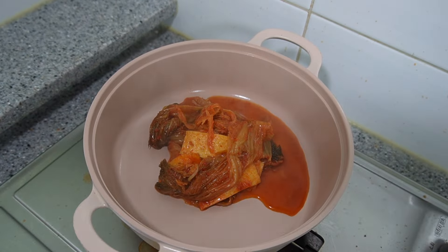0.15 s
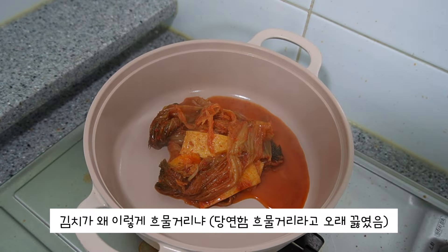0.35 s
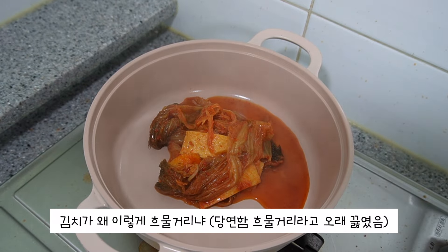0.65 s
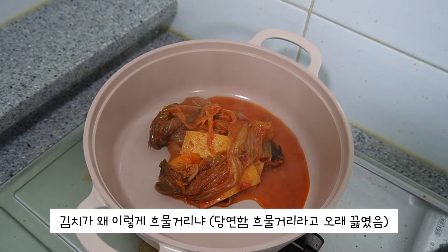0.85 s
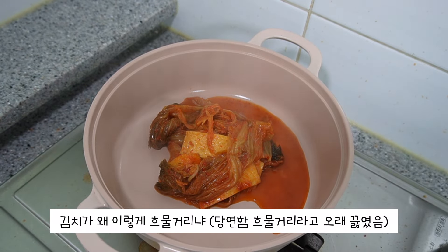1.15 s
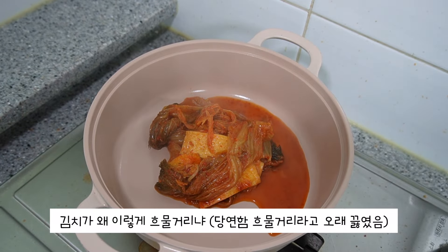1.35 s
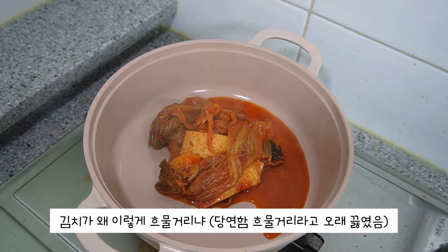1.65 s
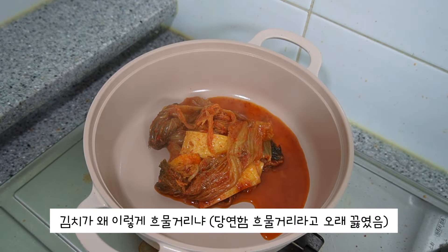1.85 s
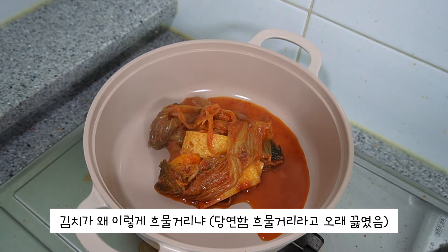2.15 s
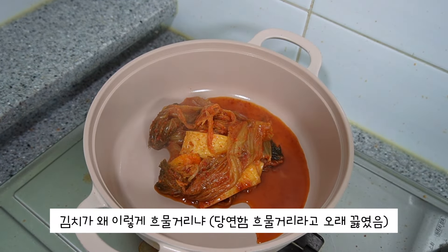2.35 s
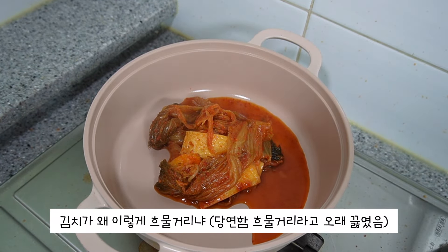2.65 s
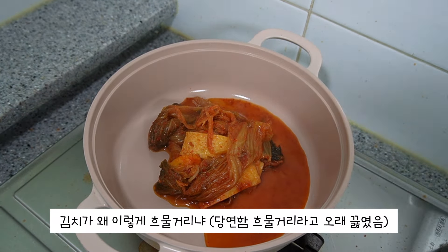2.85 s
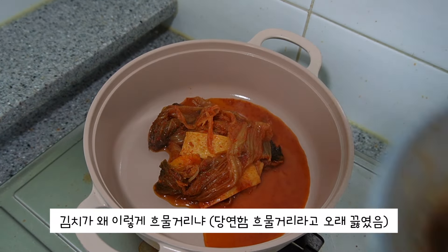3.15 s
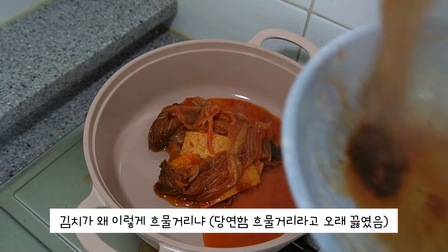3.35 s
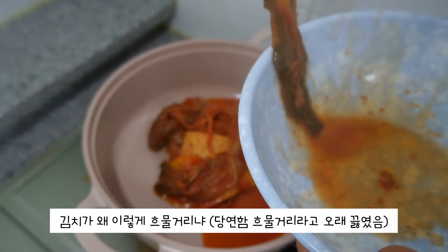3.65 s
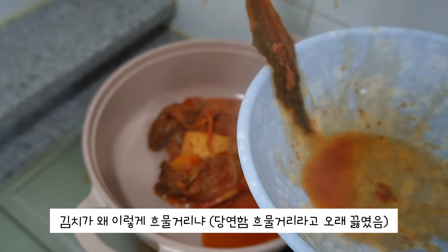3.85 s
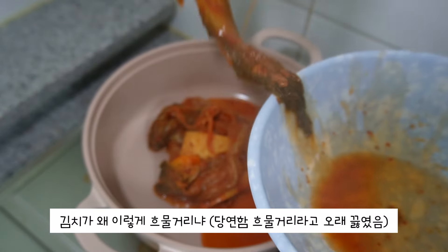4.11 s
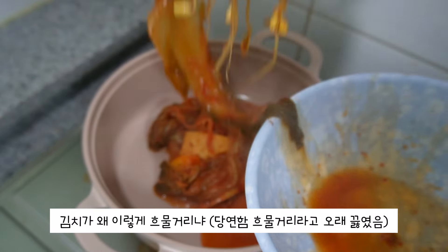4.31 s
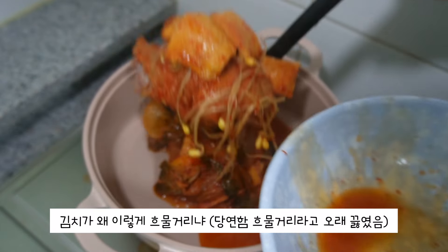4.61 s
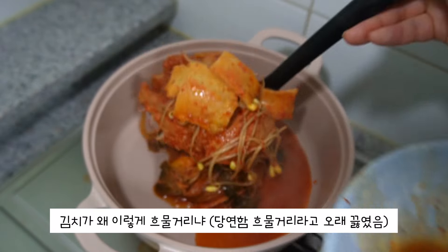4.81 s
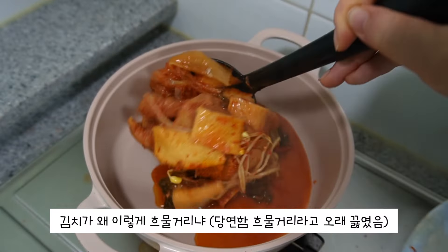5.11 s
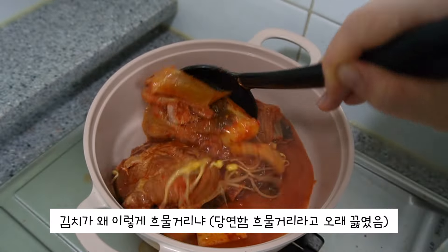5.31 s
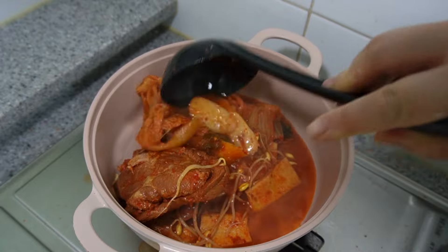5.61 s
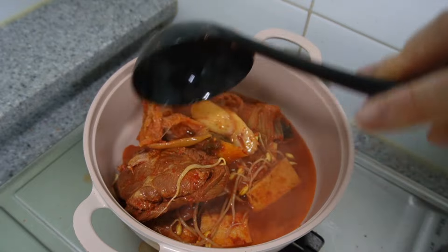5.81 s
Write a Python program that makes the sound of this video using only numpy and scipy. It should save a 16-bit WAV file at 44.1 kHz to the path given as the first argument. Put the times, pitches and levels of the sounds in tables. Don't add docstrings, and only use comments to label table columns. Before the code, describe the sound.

Rapid sharp sparking lights a gas burner in a small kitchen; a soft hiss follows, with drips, then sloppy wet food landing and being pressed.

```python
import sys
import numpy as np
from scipy import signal
from scipy.fft import rfft
from scipy.io import wavfile
from scipy.ndimage import uniform_filter1d

SR = 44100
rng = np.random.default_rng(int(sys.argv[2]) if len(sys.argv) > 2 else 0)


def inscribe(sig):
    pcm = np.round(np.clip(np.atleast_2d(sig).T, -1, 1) * 32767)
    wavfile.write(sys.argv[1], SR, pcm.astype(np.int16))


def magnitude_from_level(level_db):
    exponent = np.asarray(level_db, float) / 20
    return 10 ** exponent


N = 263277

# [f/Hz, level/dB]
ROAR_COLOUR = [(12, -45), (20, -44.5), (75, -3), (125, 0), (245, -5.5), (399, -16), (692, -9), (866, -18),
               (1110, -9.5), (1530, -13), (1730, -17), (1920, -10), (2120, -32), (2300, -21.5), (2600, -30),
               (3380, -65), (5720, -120)]
# [f/Hz, level/dB]
JET_COLOUR = [(1350, -39), (2300, -6), (2880, -6.5), (3410, -0.5), (3840, -6), (4260, -2.5), (4960, -4),
              (5780, 2), (7120, -3.5), (7710, 0.5), (8420, -5.5), (11000, -8), (15600, -12.5)]
# [f/Hz, width/Hz, level/dB]
JET_BANDS = [(4200, 260, 2), (4630, 52, -1), (5570, 86, -4), (7450, 53, -9), (9300, 150, -7),
             (10960, 600, -7), (12500, 140, -19), (13800, 200, -10)]
ROAR_DB, JETS_DB = -49.5, -55
SETTLE_DB, SETTLE_S = 10.5, 0.18
UNLIT_DB, LIT_S, SPREAD_S = -10.5, 0.35, 0.2
SEEP_DB, OPEN_S, OPENING_S = -13.5, 2.57, 0.65
WARMING_DB_PER_S = 0.5

# [t/s, peak level/dB, ring f/Hz,
# t60/s, noise share/0-1]
KNOB_CLICKS = [(.001, -41, 700, 0.031, 0.3), (.001, -43.5, 2790, 0.12, 0.7), (.002, -48, 5700, 0.046, 0.3),
               (.0155, -29, 483, 0.16, 0.74), (0.017, -33.5, 1205, 0.061, 0.4),
               (0.023, -29.5, 2260, 0.045, 0.55), (.030, -42, 5300, .03, 0.4),
               (.044, -22.5, 2660, 0.018, 0.64), (.044, -33, 5100, 0.027, 0.4),
               (0.048, -31, 4200, 0.053, 0.35), (.05, -49, 5000, .07, .9), (.066, -37, 4200, .03, 0.2),
               (.042, -44, 10500, 0.065, 0.9), (.043, -42, 13500, .04, 1), (.028, -51, 13000, .03, 1),
               (0.051, -27, 730, 0.058, 0.24), (0.558, -23.5, 2530, .01, 0.23),
               (.776, -31, 700, 0.063, 0.34), (.7997, -5, 2210, 0.0066, .1),
               (.7998, -4.5, 2870, 0.0066, 0.16), (.8, -14.5, 6850, .015, 0.23),
               (0.802, -20, 2300, 0.044, 1), (.801, -20, 750, 0.031, .6), (.812, -18.5, 800, 0.02, 0.5),
               (.804, -20, 3000, 0.015, 0.6)]
# [t/s, peak level/dB, f/Hz, t60/s]
THUDS = [(0.02, -22.5, 145, 0.12), (0.039, -21, 54, 0.37), (.825, -23, 61.7, 0.15), (1.8, -46, 28, .4),
         (4.5, -47, 28, 0.7), (4.75, -46, 28, 0.34), (5.25, -44, 28, .3), (5.42, -33, 30, 0.33),
         (5.42, -39, 465, 0.26), (5.745, -33, 220, .08), (5.88, -31, 500, .1), (5.6, -42, 482, 0.26),
         (5.91, -33, 190, .1), (5.942, -33, 200, .1)]
# [f/Hz, t60/s]
KITCHEN_T60 = [(400, 1.13), (1060, 0.25), (2790, 0.24), (7350, 0.29), (14000, 0.5)]
# [f/Hz, level/dB]
KITCHEN_COLOUR = [(300, -18), (1500, 1), (2700, -0.5), (7000, -1), (10500, -9), (13000, -8.5)]

# [t/s, level/dB, treble level/dB]
SPARKS = [(0.2099, -7, -7), (.3091, -6, -4.5), (0.41, -6, -2), (0.5102, -5.5, -0.5), (.6109, -6.5, 3.5),
          (.7117, -6.5, 4.5), (0.813, -5.5, 3), (0.9136, -5.5, 3), (1.0145, -5.5, 1.5), (1.1154, -6.5, 3),
          (1.2166, -6, -1), (1.3173, -6.5, -0.5), (1.4185, -6.5, 3), (1.5195, -6, 2), (1.6206, -6.5, 1.5),
          (1.7219, -6, 4.5), (1.8231, -6, 2.5), (1.9239, -6, 2.5), (2.0252, -6, 2.5), (2.1265, -6.5, 2.5),
          (2.2276, -6.5, 1), (2.329, -6, 2.5)]
# [f/Hz, level/dB per Hz]
SPARK_COLOUR = [(200, -34), (350, -24), (500, -15), (950, -9.5), (1250, -5), (1900, -10.5), (2120, -15),
                (3240, -10.5), (4700, -6), (6200, -6.5), (6800, -1.5), (10400, -5), (12200, -18.5),
                (14500, -13), (15600, -13.5)]
# [f/Hz, level/dB, t60/s]
BURNER_CAVITIES = [(700, -17.5, 0.093), (1300, -2.5, 0.011), (1786, -7.5, 0.028), (3250, -25, 0.07),
                   (5270, -12.5, 0.12), (5810, -9, 0.072), (6630, 7, 0.021), (6900, 2, 0.022),
                   (7130, -3, .03), (7470, -5, .03), (7780, -3.5, 0.03), (8240, -11, 0.03),
                   (8850, -5, 0.033), (10190, -12, 0.025)]
SPARK_COUNT, SPARK_LAG_S = 22, 0.00021
BODY_SPREAD_DB, TOP_SPREAD_DB = 1.5, 2.5
ALIKE_HZ, LIKENESS = 1500, 0.8

# [t/s, length/s, level/dB, brightness level/dB]
POCKETS = [
    (0.419, 0.051, -28.5, -3),
    (0.471, 0.028, -30.5, 2),
    (0.493, 0.038, -30, 0),
    (0.531, 0.045, -29.5, 0),
    (0.571, 0.041, -43, 0),
]
# [t/s, peak level/dB, f/Hz, t60/s]
POPS = [(.424, -20, 242, .04), (.43, -19, 190, .05), (.439, -21, 160, .05), (.452, -16.5, 170, .04),
        (.479, -18, 692, .03), (.483, -22, 260, 0.043), (.498, -18.5, 200, .04), (.509, -18, 689, 0.02),
        (.517, -19, 210, .03), (.535, -17, 228, 0.049), (.54, -25, 600, .02), (.547, -19.5, 210, 0.044),
        (.554, -19, 199, .04), (.556, -24, 690, 0.028)]
# [f/Hz, level/dB per Hz]
CATCH_COLOUR = [(30, -23), (90, -7), (140, 0), (190, 1), (260, -8), (330, -6), (430, -28), (600, -29),
                (3000, -88)]
# [f/Hz, level/dB per Hz]
CRACKLE_COLOUR = [(400, -20.5), (480, -6), (700, -6), (1000, -12), (1600, -16.5), (2100, -31), (4000, -49),
                  (9000, -89)]
POCKET_RISE_S, POCKET_SAG_DB, POCKET_FALL_S = 0.0087, -3, 0.007

# [t/s, length/s, level/dB]
SLOSHES = [
    (2.604, 0.075, -52.5),
    (3.051, 0.3, -54),
    (4.758, 0.068, -55),
]
# [f/Hz, level/dB per Hz]
SLOSH_COLOUR = [(300, -29), (700, 0), (1300, 4), (2500, -5.5), (3500, -7), (6000, -32)]
# [t/s, peak level/dB,
# centre f/Hz]
DRIPS = [(2.623, -37, 1110), (2.631, -39, 1400), (3.0047, -37, 9120), (3.1068, -37, 3430),
         (3.1442, -37.5, 4700), (3.2585, -42, 11410), (3.4858, -39, 4110), (3.6003, -42, 3320),
         (3.6837, -34.5, 10180), (3.7738, -41, 13150), (4.0152, -54, 1830), (4.1837, -37, 7100),
         (4.2056, -38, 12710), (4.4504, -37, 4510), (4.4576, -41, 5300), (4.4629, -33, 5100),
         (4.5113, -30, 7730), (4.526, -33, 8840), (4.5256, -37, 4280), (4.5324, -45, 7750),
         (4.7121, -39, 2480), (5.3272, -32, 3650), (5.3722, -33, 3450), (5.4003, -33, 3570),
         (5.5378, -35, 3580), (5.6706, -30, 6410), (5.7155, -30.5, 6500), (5.8033, -35, 9250),
         (5.8449, -39, 10100)]
DRIP_WIDTH, DRIP_T60 = 0.23, 0.007
# [t/s, length/s, level/dB]
SCRAPES = [(3.684, 0.0064, -45.5), (4.444, 0.026, -46), (4.485, .012, -54), (4.506, 0.0099, -42),
           (4.514, 0.0095, -35), (4.647, 0.0054, -49), (4.793, .01, -62), (5.277, 0.013, -44.5),
           (5.3, .045, -54), (5.339, .04, -54), (5.38, 0.019, -47)]
# [f/Hz, level/dB per Hz]
SCRAPE_COLOUR = [(1500, 1), (3000, -2), (4500, 6.5), (8000, 5), (12000, -1), (15500, -2.5)]
# [t/s, peak level/dB, ring f/Hz]
PLOPS = [(4.518, -25.5, 1280), (4.751, -34, 1220), (4.771, -33, 685), (4.966, -34, 1130),
         (4.995, -37, 1190), (5.014, -32, 1280), (5.066, -34, 1120), (5.232, -36, 1280),
         (5.339, -24.5, 1300), (5.5, -34, 1830), (5.561, -35, 1280), (5.588, -37, 3500), (5.607, -34, 3580),
         (5.698, -36, 1380), (5.887, -31, 1310), (5.917, -25.5, 1370), (5.942, -30, 1130),
         (5.953, -30, 633)]
# [t/s, peak level/dB, centre f/Hz, width/Hz]
SMACKS = [(4.5181, -17.5, 9300, 4970), (4.52, -22, 4060, 1000), (4.7884, -40, 1670, 2000),
          (4.7995, -34, 5230, 2400), (4.8703, -37, 13440, 3600), (4.9025, -37, 12560, 3100),
          (4.909, -31.5, 1190, 500), (4.9253, -30, 10800, 6000), (4.9676, -37, 10300, 2900),
          (5.0397, -34, 2370, 2900), (5.092, -33, 1330, 700), (5.2002, -31, 4200, 2700),
          (5.2013, -36, 11690, 2700), (5.2529, -22, 2220, 1990), (5.2666, -26, 1310, 1000),
          (5.2782, -26, 1620, 700), (5.307, -23.5, 1150, 500), (5.3075, -22.5, 4530, 1510),
          (5.344, -17.5, 4220, 2440), (5.361, -27, 1910, 2400), (5.3808, -29, 2950, 3900),
          (5.3883, -28, 4620, 1500), (5.435, -28.5, 3740, 1900), (5.4722, -29.5, 1710, 1700),
          (5.5623, -41, 11820, 3400), (5.8944, -31, 1670, 1500), (5.9192, -25.5, 4030, 1200)]
SMACK_T60 = 0.0066
# [t/s, effort level/dB]
STIR = [
    (4.72, -76),
    (4.77, -53),
    (5.09, -58),
    (5.22, -55),
    (5.27, -45.5),
    (5.44, -47.5),
    (5.87, -48.5),
    (5.9, -40.5),
    (5.97, -45),
]
FIZZ_DB, FIZZ_SLOPE, FULL_DB = -48.5, 0.95, -39
# [t/s, peak level/dB, centre f/Hz, width/Hz]
SPATTER = [(4.788, -41, 2700, 600), (4.804, -36, 5300, 1500), (4.822, -43, 14500, 2000),
           (4.8276, -36, 5310, 1200), (4.8285, -37, 10200, 1500), (4.8526, -35, 8500, 3500),
           (4.869, -38, 2980, 500), (4.884, -41, 6100, 900), (4.8955, -33, 9820, 2500),
           (4.942, -38, 4100, 900), (4.9464, -33, 11000, 2500), (4.948, -39, 4500, 3500),
           (4.9668, -32, 7080, 1000), (4.979, -39, 7900, 1500), (4.983, -38, 11500, 2000),
           (4.993, -36, 4200, 900), (5.031, -40, 6000, 2500), (5.0771, -37, 5950, 2000),
           (5.086, -39, 2900, 600), (5.1364, -39, 5680, 1200), (5.267, -34, 4000, 2000),
           (5.285, -34, 5500, 2500), (5.293, -35, 3800, 700), (5.318, -30, 2900, 900),
           (5.334, -33, 3400, 800), (5.415, -36, 7300, 2000), (5.417, -33, 3600, 900),
           (5.48, -36, 4300, 700), (5.498, -35, 6500, 3500), (5.538, -37, 5700, 1000),
           (5.552, -38, 11500, 4000), (5.585, -34, 9500, 2500), (5.802, -38, 4950, 1200),
           (5.868, -40, 5650, 1200)]

# [f/Hz, level/dB]
TOP_ROLLOFF = [(0, -14), (15780, -14), (16500, -20), (16800, -45), (17100, -60), (22050, -90)]
TOP_HZ = 15720


def evened(x):
    return x / np.sqrt(np.mean(x ** 2) + 1e-20)


def read(points, hz):
    f, value = np.transpose(points)
    return np.interp(np.log(hz + 1), np.log(f + 1), value)


def add(mix, s, sound):
    part = mix[round(s * SR):][:len(sound)]
    part += sound[:len(part)]


def coloured(x, points):
    hz = abs(np.fft.fftfreq(8192, 1 / SR))
    log_gain = np.log(magnitude_from_level(np.maximum(read(points, hz), -100)))
    taps = np.fft.ifft(np.exp(np.conj(signal.hilbert(log_gain)))).real[:4096]
    taps = taps.reshape((1,) * (x.ndim - 1) + (-1,))
    return signal.fftconvolve(x, taps, axes=-1)[..., :x.shape[-1]]


def levelled(rows):
    power = uniform_filter1d((abs(rfft(rows)) ** 2).mean(0), size=80)
    hz = np.fft.rfftfreq(rows.shape[1], 1 / SR)
    return coloured(rows, np.transpose([hz, -10 * np.log10(power / power.mean())]))


def patchy_noise(shape_db, patchy_db, flicker_db):
    hz = np.fft.rfftfreq(1024, 1 / SR)
    a, b, patches = rng.standard_normal((N // 256 + 5, 513, 3)).T
    flicker = evened(uniform_filter1d(patches[0], size=4))
    patches = uniform_filter1d(patches, size=10, axis=0)
    patches = evened(uniform_filter1d(patches, size=10, axis=1))
    z = (a + 1j * b) * magnitude_from_level(shape_db(hz)[:, None] + patchy_db * patches + flicker_db * flicker)
    return evened(signal.istft(z, nperseg=1024, noverlap=768)[1][:N])


def click(db, hz, t60, broad, rise=0.00013):
    t = np.arange(round(t60 * SR) + 9) / SR
    noise = rng.standard_normal(8000)[np.arange(len(t)) % 8000]
    band = [hz / 1.6, min(hz * 1.6, 0.45 * SR)]
    tick = evened(signal.lfilter(*signal.butter(2, band, "band", fs=SR), noise))
    ring = np.sin(2 * np.pi * hz * t)
    return magnitude_from_level(db - 60 * t / t60) * ((1 - broad) * ring + 0.93 * broad * tick) * (1 - np.exp(-t / rise))


def drip(db, hz, width_hz, t60):
    t = np.arange(1200) / SR
    snap = 0.61 * rng.standard_normal(len(t)) * magnitude_from_level(-60 * t / (3.0 * t60)) * np.sqrt(width_hz / SR)
    snap[0] += 1
    edges = np.clip([hz - width_hz / 2, hz + width_hz / 2], 300, 0.45 * SR)
    snap = signal.lfilter(*signal.butter(2, edges, "band", fs=SR), snap)
    return magnitude_from_level(db + 0.3) * snap / abs(snap).max()


def burner():
    t = np.arange(N) / SR

    def ramp(s, length):
        return np.clip((t - s) / length, 0, 1)

    def jet_shape(hz):
        bands = sum(7.2 / (1 + (2 * (hz - f) / w) ** 2) * magnitude_from_level(0.38 * db) for f, w, db in JET_BANDS)
        return read(JET_COLOUR, hz) + bands

    warming_db = WARMING_DB_PER_S * (t - OPEN_S)
    roar_db = UNLIT_DB * (1 - ramp(LIT_S, SPREAD_S)) + 0.17 * warming_db
    roar_db += (SETTLE_DB - UNLIT_DB) * (1 - ramp(0, SETTLE_S))
    jets_db = SEEP_DB * (1 - ramp(OPEN_S - OPENING_S, OPENING_S)) + warming_db
    roar = patchy_noise(lambda hz: read(ROAR_COLOUR, hz), patchy_db=1.5, flicker_db=-0.43)
    jets = patchy_noise(jet_shape, patchy_db=1.5, flicker_db=1.0)
    return magnitude_from_level(ROAR_DB + roar_db) * roar + magnitude_from_level(JETS_DB + jets_db) * jets


def knob():
    out = np.zeros(N)
    for s, *shape in KNOB_CLICKS:
        add(out, s, click(*shape, rise=0.00007))
    return out


def kitchen_tails(count):
    build_up = np.clip(np.arange(SR // 2) / SR / 0.0092, 0, 1)
    taps = rng.standard_normal((count, SR // 2)) * build_up
    hz, t, z = signal.stft(taps, SR, nperseg=256)
    z = z * magnitude_from_level(read(KITCHEN_COLOUR, hz)[:, None] - 60 * t / read(KITCHEN_T60, hz)[:, None])
    tails = signal.istft(z, SR, nperseg=256)[1][:, :SR // 2]
    return tails / np.linalg.norm(tails[0])


def kitchen(x):
    return signal.fftconvolve(x, kitchen_tails(count=1)[0])[:N]


def thuds():
    out = np.zeros(N)
    for s, db, hz, t60 in THUDS:
        add(out, s, click(db - 2.5, hz, t60, 0, rise=0.017))
    return out


def alike(rows):
    above = signal.butter(1, ALIKE_HZ, "high", fs=SR)
    stray = (LIKENESS - 1) * rows[0] + np.sqrt(1 - LIKENESS ** 2) * rows[1:]
    return rows[0] + signal.lfilter(*above, stray)


def igniter():
    t, out = np.arange(SR // 2) / SR, np.zeros(N)
    decay = (magnitude_from_level(4.5 - 60 * t / 0.0083) + magnitude_from_level(1.0 - 60 * t / 0.043)) * (1 - np.exp(-t / 0.00013))
    scatter = levelled(alike(rng.standard_normal((SPARK_COUNT + 1, len(t)))) * decay)
    echo = alike(kitchen_tails(count=SPARK_COUNT + 1))
    scatter = scatter / np.linalg.norm(scatter[0]) + magnitude_from_level(-9.0) * echo
    phases = rng.uniform(0, 2 * np.pi, len(BURNER_CAVITIES))
    phases = phases + 0.29 * rng.standard_normal((SPARK_COUNT, len(BURNER_CAVITIES)))
    rings = 0
    for k, (hz, db, t60) in enumerate(BURNER_CAVITIES):
        rings = rings + magnitude_from_level(db - 60 * t / t60) * np.sin(2 * np.pi * hz * t + phases[:, [k]])
    cracks = evened(coloured(scatter, SPARK_COLOUR)) + magnitude_from_level(13.5) * rings * (1 - np.exp(-t / 0.0002))
    trebles = signal.sosfilt(signal.butter(2, [8700, 12500], "band", fs=SR, output="sos"), cracks)
    bodies = signal.sosfilt(signal.butter(1, 2500, fs=SR, output="sos"), cracks)
    tops = signal.sosfilt(signal.butter(2, 13000, "high", fs=SR, output="sos"), cracks)
    chance = magnitude_from_level(rng.standard_normal((SPARK_COUNT, 2)) * [BODY_SPREAD_DB, TOP_SPREAD_DB]) - 1
    cracks = cracks + chance[:, :1] * bodies + chance[:, 1:] * tops
    for (s, db, treble_db), crack, treble in zip(SPARKS, cracks, trebles):
        spark = crack + (magnitude_from_level(treble_db - 1.0) - 1) * treble
        add(out, s + SPARK_LAG_S, magnitude_from_level(db - 27.5) * spark)
    return out


def flame_catching():
    low, high, lumps = rng.standard_normal((3, SR // 3))
    lumps = magnitude_from_level(2.3 * evened(uniform_filter1d(lumps, size=150)))
    low = evened(lumps * coloured(low, CATCH_COLOUR))
    high = evened(lumps * coloured(high, CRACKLE_COLOUR))
    t = POCKETS[0][0] + np.arange(len(low)) / SR
    out, flutter = np.zeros(N), 0
    for s, length, db, bright_db in POCKETS:
        rise = np.clip((t - s) / POCKET_RISE_S, 0, 1)
        fall = np.clip((s + length - t) / POCKET_FALL_S, 0, 1)
        sag_db = POCKET_SAG_DB * np.clip((t - s) / length, 0, 1)
        flutter = flutter + rise * fall * magnitude_from_level(db + sag_db) * (low + magnitude_from_level(bright_db) * high)
    add(out, t[0], flutter)
    for s, db, hz, t60 in POPS:
        add(out, s, click(db + 3.0, hz, t60, 0.21, rise=0.0014))
    return out


def slosh():
    out = np.zeros(N)
    for s, length, db in SLOSHES:
        wash = evened(coloured(rng.standard_normal(SR // 2), SLOSH_COLOUR))[:round(length * SR)]
        add(out, s, magnitude_from_level(db) * wash * np.hanning(len(wash)))
    return out


def drips():
    out = np.zeros(N)
    for s, db, hz in DRIPS:
        add(out, s, drip(db, hz, DRIP_WIDTH * hz, DRIP_T60))
    return out


def scrapes():
    out = np.zeros(N)
    for s, length, db in SCRAPES:
        grit = evened(coloured(rng.standard_normal(2000), SCRAPE_COLOUR))[:round(length * SR)]
        add(out, s, magnitude_from_level(db) * grit * signal.windows.tukey(len(grit), 0.4))
    return out


def plops():
    out = np.zeros(N)
    for s, db, hz in PLOPS:
        add(out, s, click(db + 2.5, hz, 0.021, 0.33, rise=0.00089))
    return out


def smacks():
    out = np.zeros(N)
    for s, *shape in SMACKS:
        add(out, s, drip(*shape, SMACK_T60))
    return out


def squelch():
    out = np.zeros(N)
    s, effort_db = np.transpose(STIR)
    levels_db = effort_db, FIZZ_DB + FIZZ_SLOPE * (effort_db - FULL_DB)
    t = np.arange(s[0], N / SR, 1 / SR)
    layers = np.zeros((2, len(t)))
    pitches = np.r_[np.geomspace(680, 2000, 10), np.geomspace(2600, 5200, 10)]
    for k, hz in enumerate(pitches):
        bursts = rng.random(len(t)), 170 / SR
        sizes = magnitude_from_level(2.5 * np.minimum(rng.exponential(1, len(t)), 4)) * (bursts[0] < bursts[1])
        turns = hz * np.linspace(0, 1, 400) * 400 / SR
        bubble = np.sin(2 * np.pi * turns * (1 + 0.016 * turns)) * turns * np.exp(-turns / 3.2)
        layers[k // 10] += np.convolve(sizes, bubble)[:len(t)]
    for layer, level_db in zip(layers, levels_db):
        add(out, s[0], magnitude_from_level(np.interp(t, s, level_db)) * evened(layer))
    return out


def spatter():
    out = np.zeros(N)
    for s, db, *band in SPATTER:
        add(out, s, drip(db - 3.0, *band, SMACK_T60))
    return out


def scene():
    hand = knob()
    food = slosh() + drips() + scrapes() + plops() + smacks() + squelch() + spatter()
    soft = flame_catching() + food
    room = kitchen(magnitude_from_level(-11.5) * hand + magnitude_from_level(-13.0) * soft)
    return (burner() + hand + room + thuds() + igniter() + soft)[None]


def band_limit(x):
    return signal.sosfilt(signal.butter(12, 17090, fs=SR, output="sos"), x)


def record(dry):
    hz, db = np.transpose(TOP_ROLLOFF)
    dry = 0.9 * np.tanh(dry / 0.9)
    top = signal.oaconvolve(dry, signal.firwin(801, TOP_HZ, pass_zero=False, fs=SR)[None], "same")
    body = dry - top
    top = signal.oaconvolve(top, signal.firwin2(401, hz, magnitude_from_level(db), fs=SR)[None], "same")
    open_gate = uniform_filter1d(top ** 2, size=300) > magnitude_from_level(-68.0) ** 2
    gate = uniform_filter1d(open_gate * 1.0, size=200)
    return band_limit(body + top * gate)


dry = scene()
out = record(dry)
inscribe(out)
```